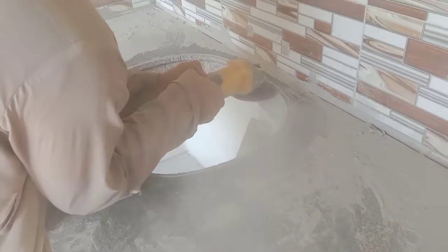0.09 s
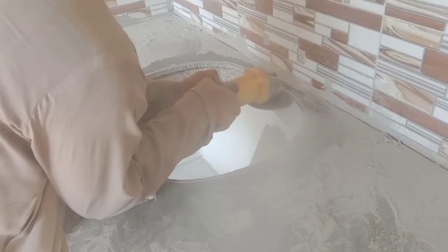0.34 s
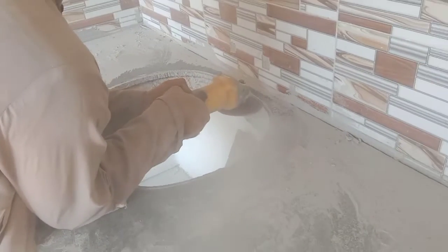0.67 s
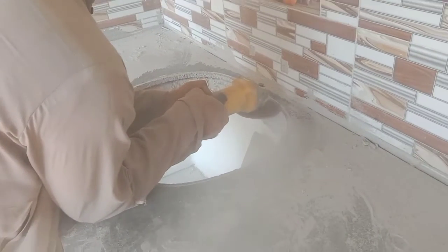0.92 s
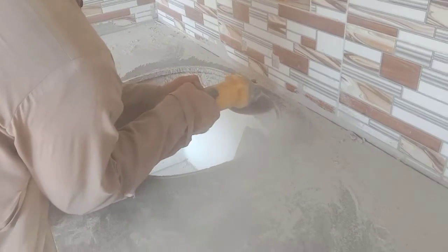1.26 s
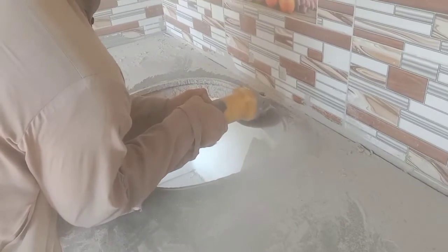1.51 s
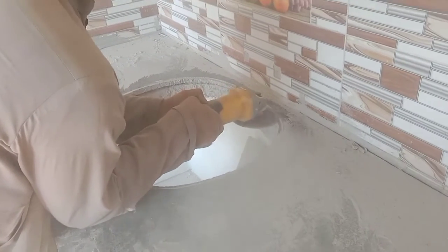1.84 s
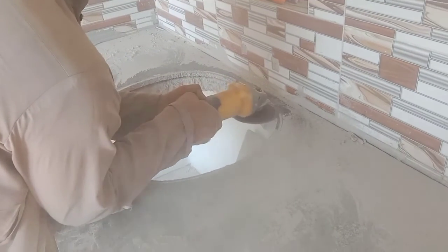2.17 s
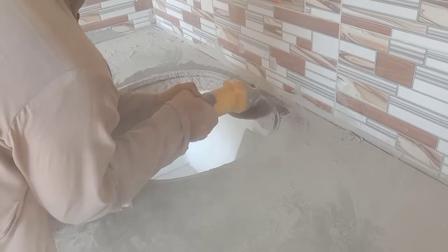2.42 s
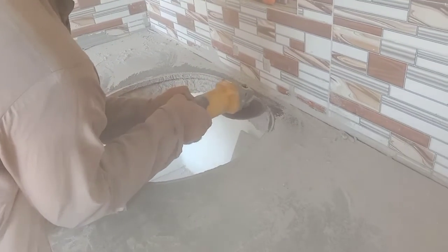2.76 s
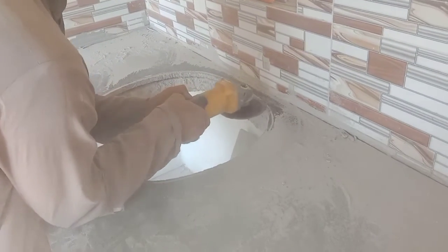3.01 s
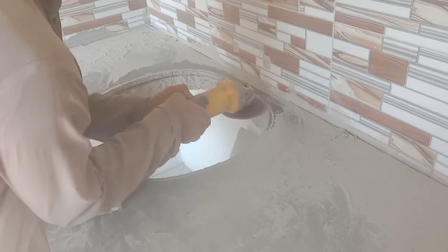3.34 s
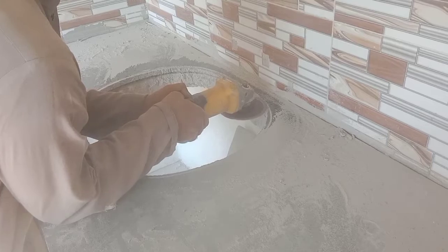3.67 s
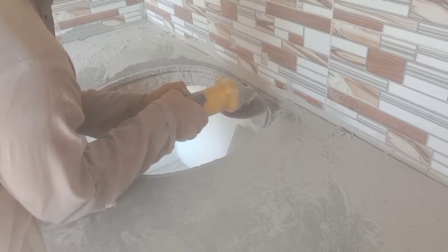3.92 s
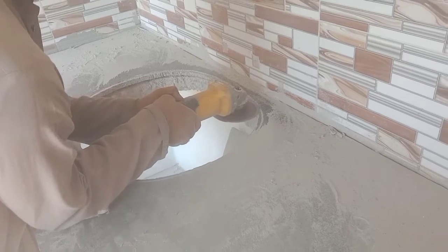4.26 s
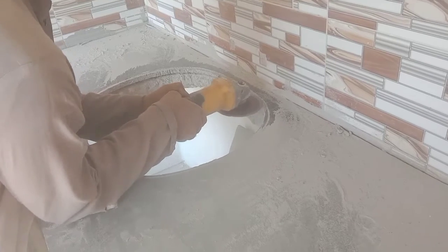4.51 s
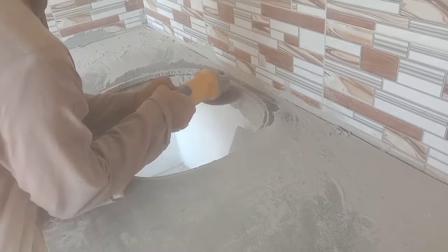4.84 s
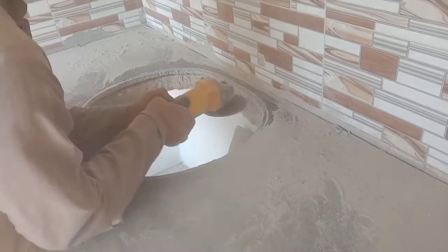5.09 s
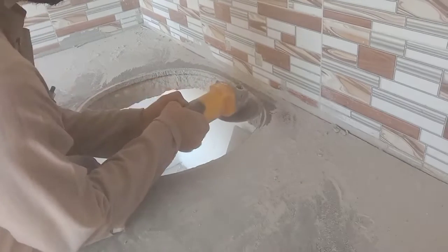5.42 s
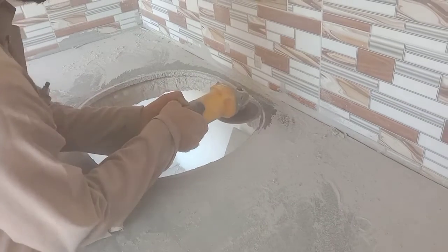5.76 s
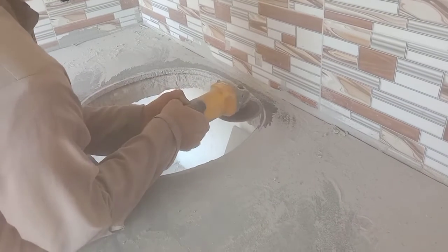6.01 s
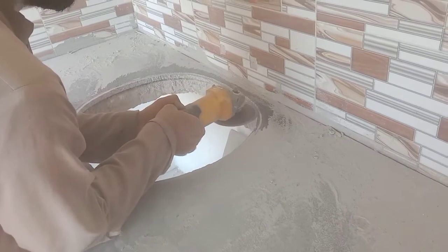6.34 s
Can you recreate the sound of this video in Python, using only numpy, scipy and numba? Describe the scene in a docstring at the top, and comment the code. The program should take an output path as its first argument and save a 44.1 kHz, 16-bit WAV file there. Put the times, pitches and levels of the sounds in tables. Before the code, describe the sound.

A grinder disc howls and sizzles against a stone countertop, spins free for half a second near the end, then resumes grinding.

```python
"""An angle grinder works the edge of a sink cutout in a stone countertop, in a small tiled room.
Grit strikes make the slab roar and the disc howl, ring and sizzle in narrow modes that shift as the
contact moves along the rim. Near five seconds the disc lifts off for half a second, leaving only
the motor's whine and the rush of its fan. Mono."""
import sys
import numpy as np
from scipy import signal
from scipy.fft import rfft, irfft
from scipy.io import wavfile
from scipy.ndimage import uniform_filter1d
from numba import njit

SR = 44100
rng = np.random.default_rng(int(sys.argv[2]) if len(sys.argv) > 2 else 0)


def store_pcm(level_fs):
    """Save levels as 16-bit WAV."""
    pcm = np.round(np.clip(level_fs, -1, 1) * 32767).astype(np.int16)
    wavfile.write(sys.argv[1], SR, np.atleast_2d(pcm).T)


N = 285327
T = np.arange(N) / SR
BIN_HZ = np.arange(N // 2 + 1) * SR / N
LIFT_S, LAND_S = 4.88, 5.416  # the disc leaves the stone and is set down again


def undb(db):
    """Decibels to gain."""
    return 10 ** (np.asarray(db) / 20)


def unit(x):
    """Scale to rms 1."""
    return x / np.sqrt(np.mean(x ** 2))


def curves(table):
    """One automation curve for each column after the time column."""
    times, *columns = np.transpose(table)
    return [np.interp(T, times, column) for column in columns]


def swells(events):
    """A smooth hump in dB for each (centre_s, length_s, gain_db)."""
    return sum(db * np.cos(np.pi * np.clip((T - centre_s) / length_s, -.5, .5)) ** 2
               for centre_s, length_s, db in events)


def drift(rate_hz):
    """Random modulation at rms 1 that swings about rate_hz times a second."""
    knots = rng.standard_normal(4096)
    return unit(np.interp(3 * rate_hz * T, np.arange(len(knots)), knots))


def colour(x, eq):
    """Shape x with an EQ curve of (freq_hz, level_db) points, at rms 1."""
    hz, db = np.transpose(eq)
    gain = undb(np.interp(np.log(BIN_HZ + 1), np.log(hz), db))
    return unit(irfft(rfft(x) * gain, N))


@njit
def bandpass(x, centre_hz, width_hz):
    """State-variable band-pass with a moving centre, where its gain is 1."""
    out, band_state, low_state = np.empty(len(x)), 0., 0.
    for i in range(len(x)):
        g = np.tan(np.pi * centre_hz[i] / SR)
        damping = np.pi * width_hz / SR * (1 + g * g) / g
        band = (band_state + g * (x[i] - low_state)) / (1 + g * (g + damping))
        band_state = 2 * band - band_state
        low_state += 2 * g * band
        out[i] = damping * band
    return out


def resonate(x, pitch_hz, width_hz):
    """One resonance; a second, wider band-pass steepens its far skirts."""
    centre_hz = pitch_hz * np.ones(N)
    return bandpass(bandpass(x, centre_hz, float(width_hz)), centre_hz, 5. * width_hz)


def touch(release_s, attack_s):
    """Contact envelope: 1 on the stone, dying away after the lift and building again after landing."""
    fading = np.exp(-np.maximum(T - LIFT_S, 0) / release_s)
    building = 1 - np.exp(-np.maximum(T - LAND_S, 0) / attack_s)
    return np.maximum(fading, building)


def grit(grains_per_s, spread_db):
    """Grains of stone breaking off: dense clicks, a few much larger than the rest."""
    strikes = rng.random(N) < grains_per_s / SR
    size = undb(spread_db * np.minimum(rng.exponential(size=N), 5))
    return unit(strikes * size * rng.choice([-1, 1], N))


def rubbed_disc(modes, place, lean, spread_db, wobble_hz, flicker_db, flicker_hz):
    """Each mode catches its own grains; the unsteady contact detunes it and feeds it in fits."""
    out = 0
    for pitch_hz, width_hz, level_db, shift_hz, place_db, lean_db in modes:
        feed = undb(level_db + place_db * place + lean_db * lean + flicker_db * drift(flicker_hz))
        grains = feed * grit(14000, spread_db)
        out += resonate(grains, pitch_hz + shift_hz * place + wobble_hz * drift(12), width_hz)
    return unit(out)


def squeal(ring, hold, window_s):
    """Friction sustains a ring that fades and damps one that swells, like a compressor."""
    power = uniform_filter1d(ring ** 2, int(window_s * SR)) + 1e-9
    return unit(ring / power ** (hold / 2))


# tone of the stone under the grit: freq_hz, level_db
SLAB_EQ = [(20, -12), (40, -18), (75, -3.5), (150, 1), (300, -1), (520, -3.5), (800, -2), (1250, 0),
           (1650, -3), (2100, -9), (2700, -10), (3600, -4.5), (7000, -30.5)]


def slab_roar(pressure_db, judder):
    """The heavy slab is well damped and answers the grit with a broad roar."""
    roar = colour(grit(grains_per_s=5000, spread_db=2.6), SLAB_EQ)
    return roar * undb(-21 + pressure_db + 1.08 * judder)


# low disc modes: pitch_hz, width_hz, level_db, shift_hz_per_place, db_per_place, db_per_lean
HOWL_MODES = [(3010, 124, -1.5, -7, -3.5, -3), (3108, 118, 0, 5, 10, 4), (3213, 84, 1, -10, -6.5, -0.5),
              (3300, 72, 3, 8, 2, 1.5), (3516, 120, -7, 0, 4.5, 0), (3960, 46, 0, 10, 3, -0.5)]
# the howl swells or stalls: centre_s, length_s, gain_db
HOWL_SURGES = [(0, 0.12, -4), (.64, 0.12, -2.5), (.77, .12, 2), (1.92, .15, -5), (2.02, 0.062, 3.5),
               (2.265, 0.047, -12), (2.35, .16, 1), (2.54, 0.1, 3), (2.73, .16, 2.5), (2.99, .1, -4),
               (3.5, .12, -3), (3.74, 0.43, 1), (4.33, 0.19, 2), (4.87, 0.25, -3.5), (5.435, .05, 1),
               (5.52, 0.19, 3.5), (5.8, 0.21, 0), (6.13, 0.24, -4)]


def disc_howl(pressure_db, place, lean):
    """The disc's low modes lie close together and beat."""
    modes = rubbed_disc(HOWL_MODES, place, lean,
                        spread_db=2.5, wobble_hz=8.6, flicker_db=1.54, flicker_hz=23)
    level_db = -19.5 + 0.16 * pressure_db - 1.5 * place + swells(HOWL_SURGES) + 0.5 * drift(20)
    return squeal(modes, hold=0.64, window_s=0.082) * undb(level_db)


# middle disc modes: pitch_hz, width_hz, level_db, shift_hz_per_place, db_per_place, db_per_lean
RING_MODES = [(4480, 63, -13, -32, -2, -2), (5033, 70, 2.5, 42, 1.8, 0), (5724, 52, -3, -44, 0.49, -1),
              (6467, 53.5, 0, 52, -0.18, -1.8), (7354, 51, -7, -54, -0.52, 2.5),
              (7680, 120, -25.5, 0, 1, -3), (8300, 51, -18.5, 75, -1.1, -1)]
# brief whistles: centre_s, length_s, pitch_hz, boost_db
RING_FLARES = [(1.895, 0.21, 6500, 7), (2.614, 0.067, 5840, 11), (2.953, .14, 5760, 2),
               (3.108, 0.18, 5070, 6), (3.25, 0.087, 5713, 5), (4.87, .17, 6467, 5.5),
               (5.435, 0.06, 5032, 3.5)]


def disc_ring(pressure_db, place, lean):
    """The middle modes stand alone and whistle; one that the rim catches flares for a moment."""
    modes = rubbed_disc(RING_MODES, place, lean,
                        spread_db=2, wobble_hz=13, flicker_db=0.5, flicker_hz=22)
    ring = squeal(modes, hold=0.31, window_s=0.05)
    flares = 0
    for centre_s, length_s, pitch_hz, boost_db in RING_FLARES:
        whistle = bandpass(ring, np.full(N, float(pitch_hz)), width_hz=400.)
        flares += whistle * (undb(swells([(centre_s, length_s, boost_db)])) - 1)
    return (ring + flares) * undb(-20 + 0.0075 * pressure_db + 0.24 * place)


# tone of the scraping: freq_hz, level_db
SCRAPE_EQ = [(500, -21), (2000, -10), (2750, -1), (3650, 4.5), (4200, -15), (4750, -2.5), (5350, 0.5),
             (6250, 0.5), (6850, -14), (7900, -26), (9000, -13.5), (15500, -9)]


def grit_scrape(pressure_db, place, judder):
    """Dense, even grains fill the gaps between the disc's modes with a rasp."""
    rasp = colour(grit(grains_per_s=12000, spread_db=1), SCRAPE_EQ)
    return rasp * undb(-24 + 0.0075 * pressure_db + 0.24 * place + 1.2 * judder)


# top disc modes: pitch_hz, width_hz, level_db, shift_hz_per_place, db_per_place, db_per_lean
SIZZLE_MODES = [(9265, 55, -5, -75, .5, 0), (9640, 260, -10.5, 0, 1, 0), (10395, 80, 1.5, 60, 0, 0),
                (11060, 150, -10.5, 50, 1, 0), (11560, 190, -6, 80, -.5, -1), (12010, 220, -5, 0, 0, -1),
                (12735, 140, -.5, 60, 0, -.5), (13790, 130, 1.2, 90, 1.5, 0), (14040, 190, -4.5, 0, -1, 0),
                (14970, 200, -4, 40, -1.5, 0), (15295, 115, 3, 80, 1.7, 1.5)]
# tone of the dust hiss: freq_hz, level_db
DUST_EQ = [(3000, -30), (8000, -8), (9000, -1), (10900, 1), (12300, 1), (13250, -2), (14500, 0),
           (15500, -1)]


def disc_sizzle(pressure_db, place, lean):
    """The highest modes shimmer over a hiss of fine dust."""
    shimmer = rubbed_disc(SIZZLE_MODES, place, lean,
                          spread_db=2, wobble_hz=13, flicker_db=1.6, flicker_hz=20)
    dust = colour(grit(grains_per_s=8900, spread_db=4), DUST_EQ)
    slack_db = np.minimum(pressure_db + 3, 0)  # pressure above -3 dB adds no more sizzle
    level_db = -25.5 + 0.47 * slack_db + 0.4 * place + 0.7 * drift(18)
    return unit(shimmer + undb(-10.5) * dust) * undb(level_db)


# how the disc meets the rim: time_s, place, lean (both unitless, roughly -1 to 1)
RIM_CONTACT = [(0, -0.55, -0.19), (.65, -0.6, -1.2), (1.0, -0.78, -0.15), (1.5, -0.91, 0.36),
               (2.1, -1.2, 0.9), (2.6, -0.066, -.2), (3.3, 0.22, 0.061), (3.8, 0.02, 1),
               (4.3, 0.078, -0.099), (4.8, -0.07, -0.91), (5.45, 0.53, 0.97), (5.75, 0.74, -1.5),
               (6.1, 0.85, -0.2), (6.47, .5, -0.84)]
# how hard the hands press: time_s, pressure_db
HAND_PRESSURE = [(0, 0), (1.0, 0.5), (2.13, 1), (2.36, -4.5), (2.8, -3.5), (3.3, -4), (3.62, 0),
                 (3.8, -2.3), (4.4, -1.4), (4.48, -5.5), (4.87, -6), (5.42, -10.5), (5.8, -1), (6.47, -2.5)]
# the disc digs in for a moment: centre_s, length_s, added_pressure_db
DISC_DIGS = [(2.55, .18, 6), (2.91, 0.086, 2.5), (4.39, 0.054, 2.5), (4.83, 0.17, 3.5), (6.26, 0.18, 1.5)]


def grinding():
    """Grit drives slab and disc as the tool judders in the hands; pressure and place set the mix."""
    pressure_db = curves(HAND_PRESSURE)[0] + swells(DISC_DIGS)
    place, lean = curves(RIM_CONTACT)
    judder = drift(32)
    stone = slab_roar(pressure_db, judder) + grit_scrape(pressure_db, place, judder)
    disc = disc_howl(pressure_db, place, lean) + disc_ring(pressure_db, place, lean)
    sizzle = disc_sizzle(pressure_db, place, lean)
    return (stone * touch(release_s=0.014, attack_s=0.023)
            + disc * touch(release_s=0.082, attack_s=0.0053)
            + sizzle * touch(release_s=0.02, attack_s=0.006))


# partials of the rotor's whine: shaft_multiple, level_db
WHINE_PARTIALS = [(4, -10), (5, 0), (6, 11), (7, -16), (10, -9)]
# resonances of the housing: pitch_hz, width_hz, level_db
HOUSING_MODES = [(395, 28, -13), (633, 36, -13), (960, 66, -3.5), (1460, 110, -7), (2037, 52, -7.5),
                 (2589, 85, 2), (3090, 120, 3), (3230, 83, 4), (5300, 510, -7)]
# tone of the cooling air: freq_hz, level_db
FAN_EQ = [(30, -38), (230, -35), (380, -6), (1200, -4), (2000, -2), (2800, -.5), (3450, 0), (3900, -7),
          (4800, -2), (5400, 3.5), (6000, 0), (7100, -.5), (8000, -11.5), (11500, -10.5), (15500, -17)]


def motor(free_hz=495, loaded_hz=478):
    """The rotor whines and fan air blows through the housing; both sink when load slows the shaft."""
    load = touch(release_s=0.11, attack_s=0.03)
    shaft_hz = (free_hz + (loaded_hz - free_hz) * load) * (1 + 0.0035 * drift(7.2))
    angle = 2 * np.pi * np.cumsum(shaft_hz) / SR
    whine = unit(sum(undb(db + 2.6 * drift(27)) * np.sin(k * angle) for k, db in WHINE_PARTIALS))
    draught = rng.standard_normal(N)
    housing = unit(sum(undb(db) * resonate(draught, hz, width) for hz, width, db in HOUSING_MODES))
    air = colour(rng.standard_normal(N), FAN_EQ)
    return (undb(-23.5) * air + undb(-25) * housing + undb(-36.5) * whine) * undb(-6 * load)


def scene():
    """Grinder on stone, the same in both ears."""
    return np.tile(grinding() + motor(), (2, 1))


def flutter(x, rate_hz=172.27, low_depth=0.035, high_depth=0.18, split_hz=8500):
    """A fast, even tremolo, deepest in the treble."""
    treble = signal.sosfiltfilt(signal.butter(2, split_hz, "high", fs=SR, output="sos"), x)
    return x + np.cos(2 * np.pi * rate_hz * T) * (low_depth * (x - treble) + high_depth * treble)


def record(dry, drive=0.94, top_hz=15430):
    """The sound flutters, then the phone rounds the highest peaks and cuts the top."""
    rounded = np.tanh(drive * flutter(dry)) / drive
    return irfft(rfft(rounded) / np.sqrt(1 + (BIN_HZ / top_hz) ** 800), N)


dry = scene()
out = record(dry)
store_pcm(out)
```